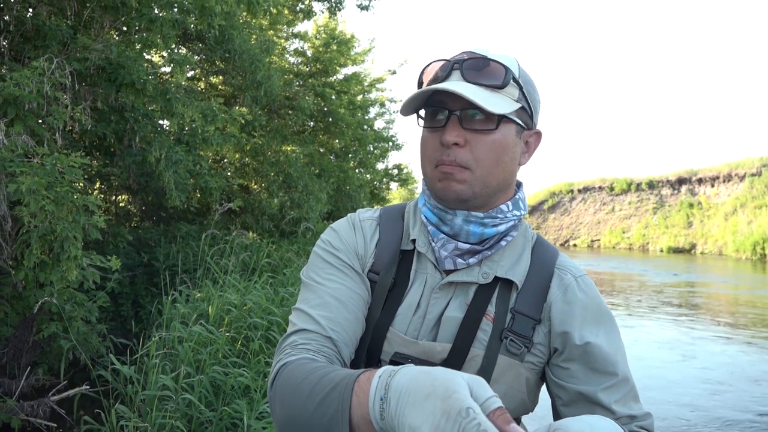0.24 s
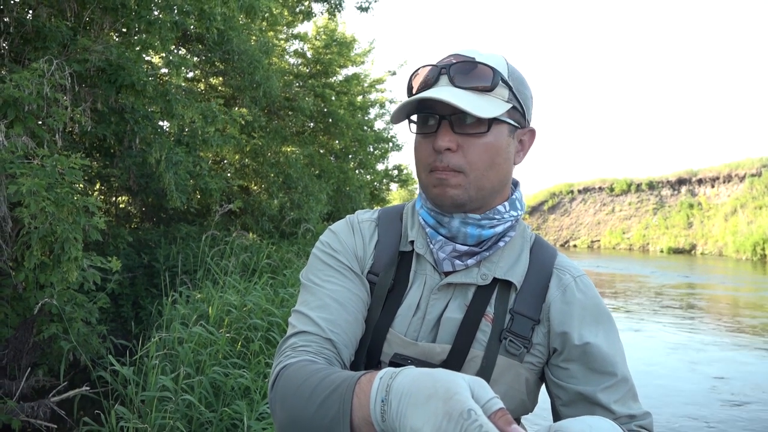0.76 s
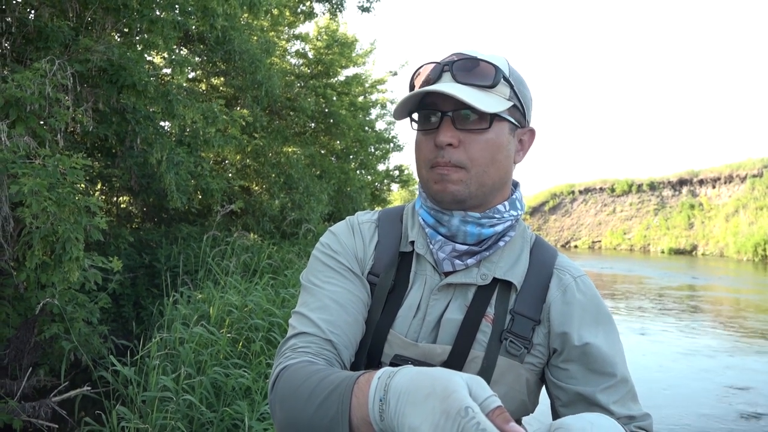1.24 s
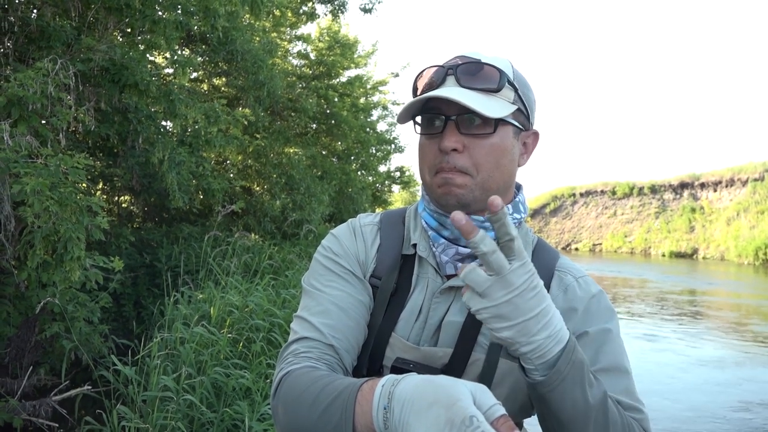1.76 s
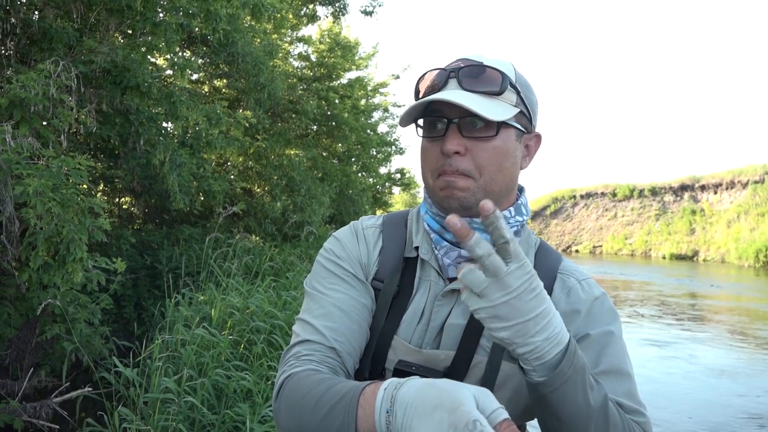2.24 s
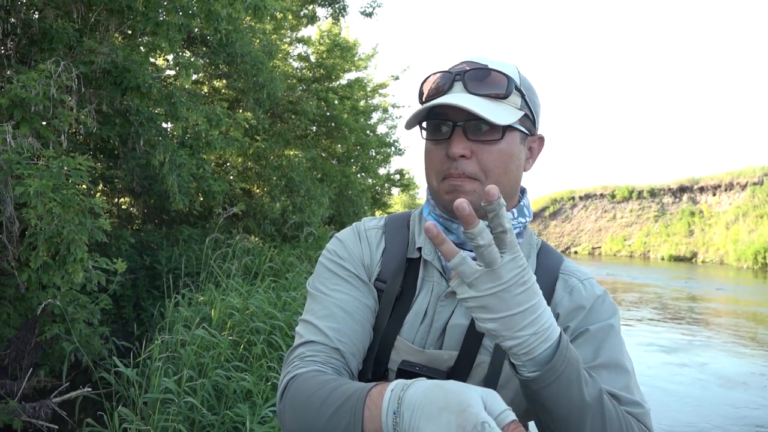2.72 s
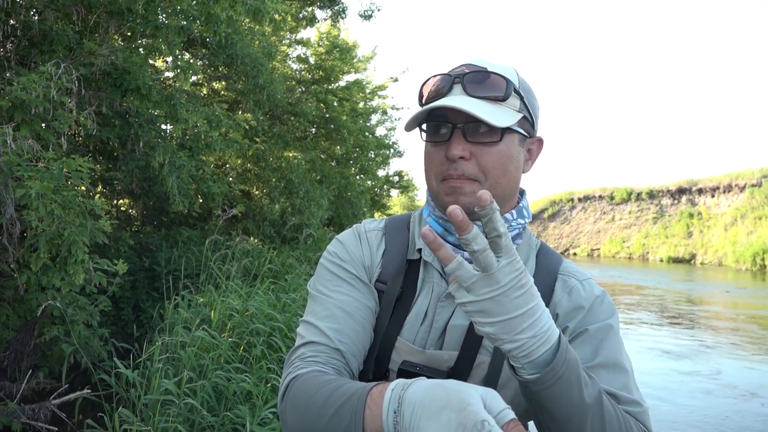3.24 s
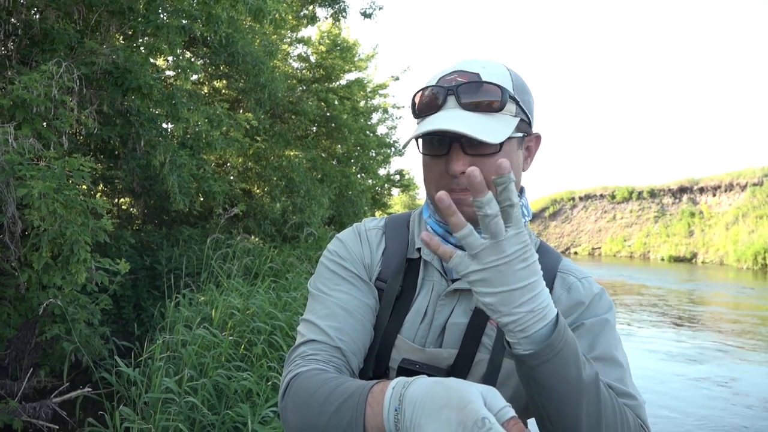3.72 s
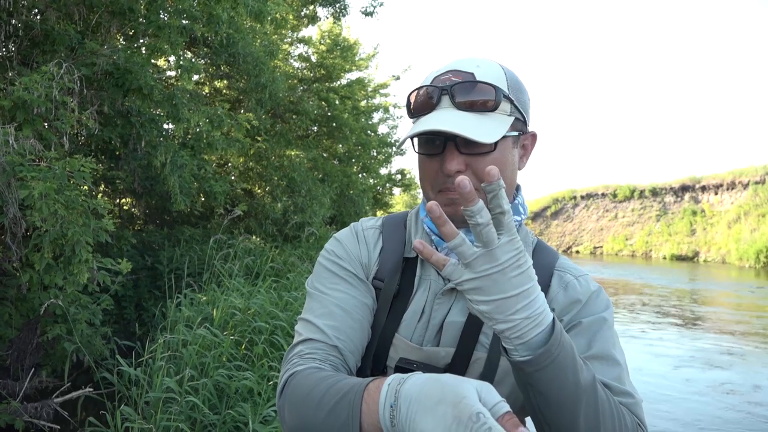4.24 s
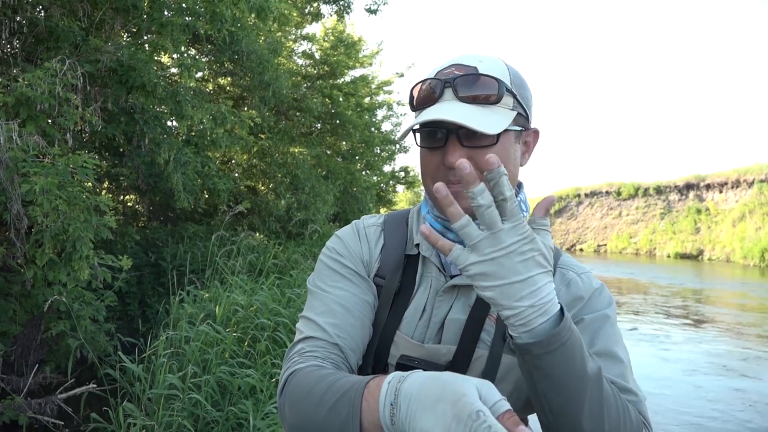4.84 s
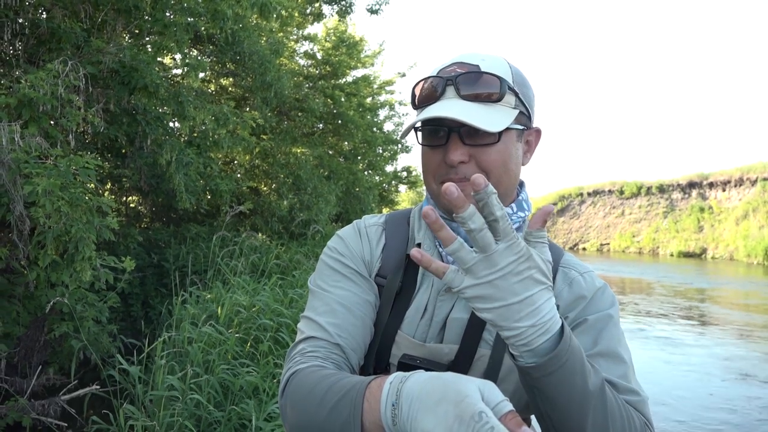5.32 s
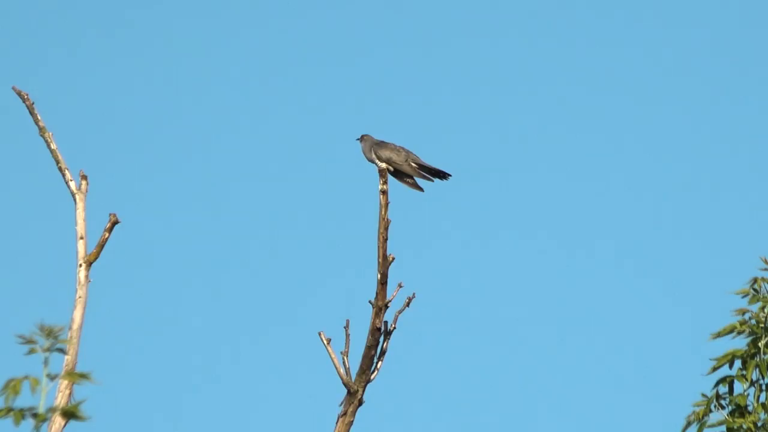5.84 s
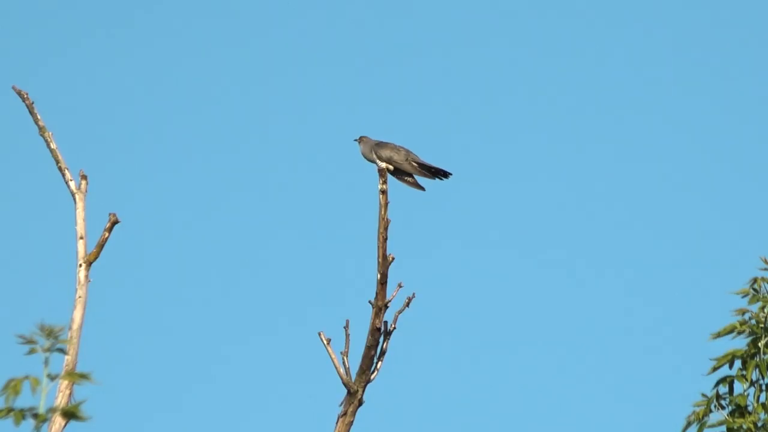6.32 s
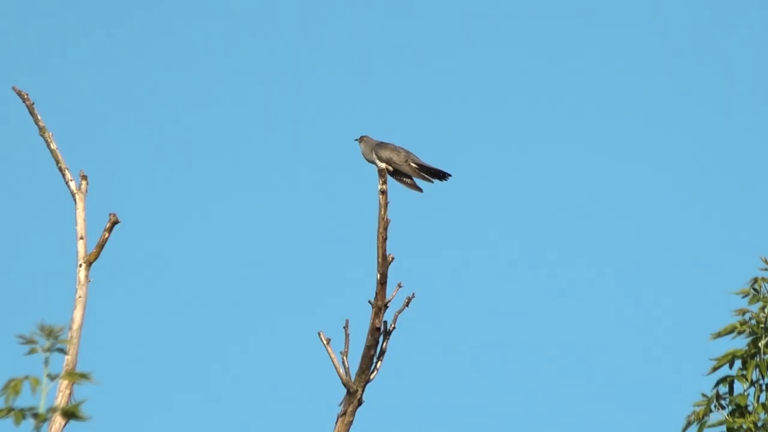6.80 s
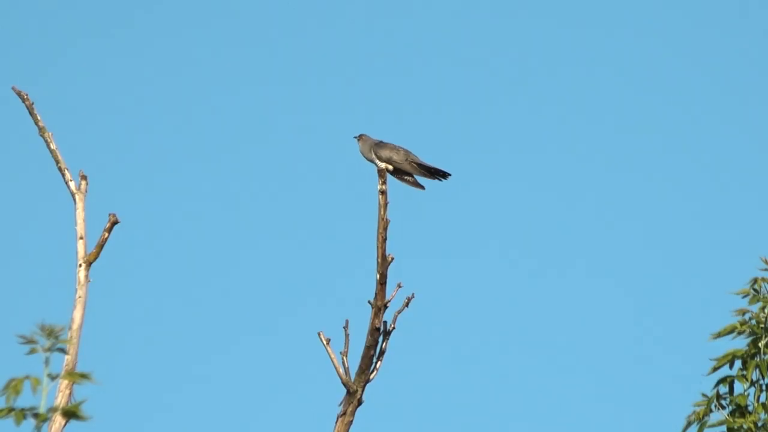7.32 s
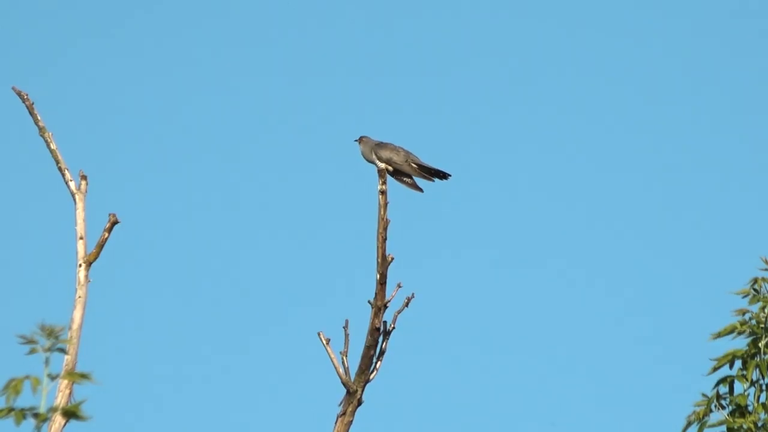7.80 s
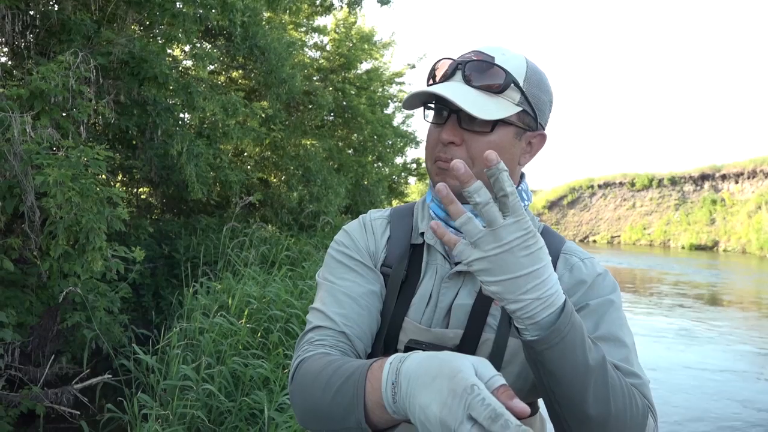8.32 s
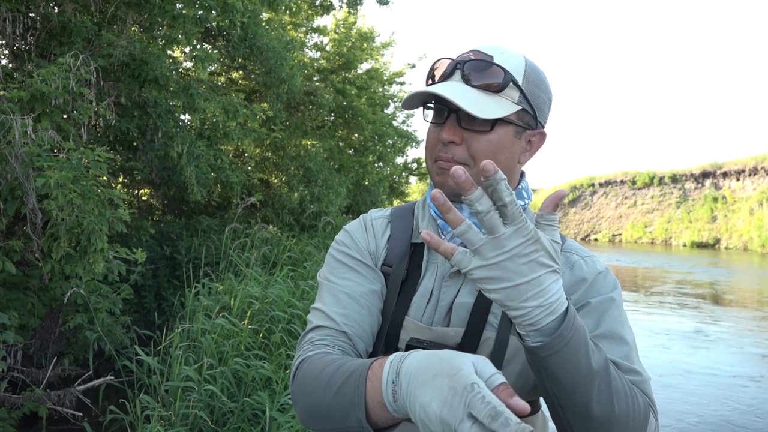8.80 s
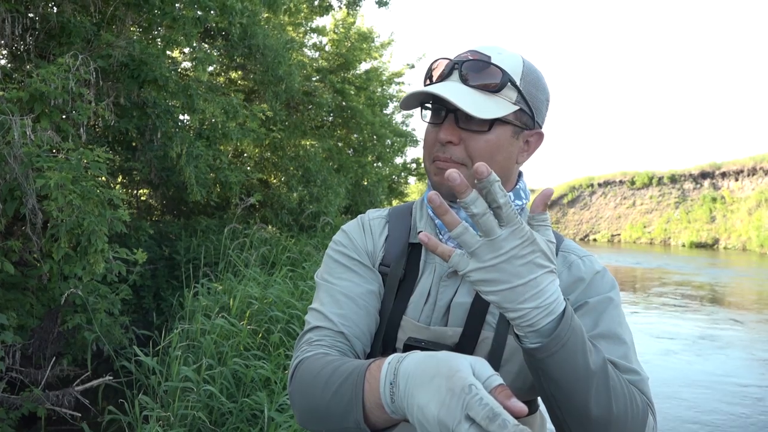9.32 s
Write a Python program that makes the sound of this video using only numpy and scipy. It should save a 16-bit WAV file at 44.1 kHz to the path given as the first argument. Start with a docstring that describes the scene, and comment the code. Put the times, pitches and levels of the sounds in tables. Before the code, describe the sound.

From the start a small river babbles close by: ringing bubbles, rising gurgles, plops, sharp droplet ticks and a soft wash, easing briefly around 0.5 s, with light breeze rumble that gusts from 3 to 4.5 s. A cuckoo calls at about 0.4, 1.9, 3.3 and 4.7 s, each an arched, nearly pure high note followed 0.3 s later by a louder, sagging lower one. A tiny bird whistle falls near 1.1 s. At 5.7 s water and breeze stop abruptly, leaving faint airy hiss. Cuckoo calls at 6.1 and 7.4 s are quieter, with stronger woodland echo. Thin falling chips, a soft trill around 6.0 to 6.6 s, and from 6.8 s a rapid, swelling string of hooked warbles ending in a hoarse slur near 8 s fill the space. At 8.2 s the bubbling river returns abruptly; the last full cuckoo call comes at 8.7 s, and water continues to the end.

```python
"""Cuckoo by a small river

A cuckoo repeats its two-note call, near-sine glides, from a dead tree by a river that gurgles and spatters.
The water is ringing bubbles, gliding gurgles, noisy splashes and a soft wash; a breeze rumbles on the microphone.
For a while one listens away from the water, farther from the bird: river and breeze are silent, and the calls
are quieter and echo more strongly off the wood's edge. Songbirds whistle short slurs, blurred by noise tails."""
import sys
import numpy as np
from scipy import signal
from scipy.fft import rfft, irfft
from scipy.io import wavfile
from scipy.ndimage import uniform_filter1d

SR = 44100
rng = np.random.default_rng(int(sys.argv[2]) if len(sys.argv) > 2 else 0)


def unload_wav(signal):
    """Save mono or channel-first audio to the path in sys.argv[1] as 16-bit WAV at rate SR, clipped to [-1, 1]."""
    wavfile.write(
        sys.argv[1],
        SR,
        np.round(np.clip(np.atleast_2d(signal).T, -1, 1) * 32767).astype(np.int16),
    )


N = 421596
TIME = np.arange(N) / SR


def from_db(db):
    """Decibels to amplitude ratio."""
    return 10 ** (np.asarray(db) / 20)


def rms_one(x):
    """Scale to rms 1."""
    return x / np.sqrt(np.mean(x ** 2) + 1e-20)


def in_time(rows):
    """A curve of (s, value) rows at every sample."""
    return np.interp(TIME, *np.transpose(rows))


def at_hz(points, hz):
    """A spectrum read on a log-frequency axis."""
    known_hz, level = np.transpose(points)
    return np.interp(np.log(hz), np.log(known_hz), level)


def add(track, s, sound):
    """Mix a sound in at time s."""
    start = int(np.clip(round(s * SR), 0, N))
    track[start:start + len(sound)] += sound[:N - start]


def phase_of(hz):
    """Phase in radians of a gliding pitch."""
    return 2 * np.pi * np.cumsum(hz) / SR


def swell(t, length, attack, release):
    """A rounded attack, a hold and a rounded release; silent outside."""
    rise = np.sin(np.pi / 2 * np.clip(t / attack, 0, 1))
    return rise * np.sin(np.pi / 2 * np.clip((length - t) / release, 0, 1))


def noise(spectrum):
    """Noise of the given colour; rms 1."""
    hz = np.maximum(np.fft.rfftfreq(N, 1 / SR), 1)
    return rms_one(irfft(rfft(rng.standard_normal(N)) * from_db(at_hz(spectrum, hz)), N))


def foliage(x, t60, build_s):
    """Countless small reflections off leaves and trunks build up and die away."""
    t = np.arange(SR) / SR
    tail = rng.standard_normal(SR) * from_db(-60 * t / t60) * (1 - np.exp(-t / build_s))
    return signal.fftconvolve(x, tail / np.linalg.norm(tail))[:N]


# Colour of far river and leaves. Each row: frequency in Hz, relative level in dB per Hz.
AIR_COLOUR = [(20, -12), (55, 3), (150, -1), (270, 0), (420, 5), (800, 2.5), (1500, -3.5), (3000, -4),
              (7000, -13), (16000, -17.5)]


def air():
    """Far river and leaves merge into steady coloured noise."""
    return from_db(-62.5) * noise(AIR_COLOUR)


# Colour of the breeze on the microphone. Each row: frequency in Hz, relative level in dB per Hz.
BREEZE_COLOUR = [(20, -23), (45, -1), (70, 2), (120, -6), (250, -12), (600, -54)]
# Gusts on the microphone. Each row: start in seconds, length in seconds, level in dB.
BREEZE_GUSTS = [(3, 1.55, -57), (4.452, 3.8, -66), (8.25, 1.5, -69)]
STEADY_BREEZE_DB, GUST_EDGE_S = -71, 0.3


def breeze():
    """A light steady rumble on the microphone, with gusts on top."""
    gusts = sum(from_db(db) * swell(TIME - s, length, GUST_EDGE_S, GUST_EDGE_S)
                for s, length, db in BREEZE_GUSTS)
    return (from_db(STEADY_BREEZE_DB) + gusts) * noise(BREEZE_COLOUR)


def lapping(count, spread_db):
    """Wavelets lap one after another, unevenly spaced and unequal in strength: rows of (s, dB)."""
    lag, strength = rng.random((count, 2)).T
    lap_s = (np.arange(count) + 2 * lag - 1) / count * TIME[-1]
    return np.column_stack([lap_s, spread_db * (2 * strength - 1)])


def bubble(hz, t60, rise):
    """Trapped air swells within about half a cycle, rings and dies; its pitch shifts as it nears the surface."""
    age = np.linspace(0, 1, max(int(t60 * SR), 8))
    phase = phase_of(hz * (1 + rise * age))
    onset = 1 - np.exp(-(phase / np.pi) ** 2)
    return np.sin(phase) * onset * np.exp(-np.log(1000) * age)


# Small bubbles by size. Each row: pitch in Hz, relative level in dB.
BUBBLE_LEVELS = [(350, -14), (600, 7.5), (1100, 10), (2000, 11), (3200, 10), (5000, 2.5), (7500, 2),
                 (11000, 0.5)]


def babble(laps, count, spread_db, cycles, flurry_s=.05):
    """Each lap of the water sheds a flurry of small bubbles of all sizes; the low ones ring longest."""
    out = np.zeros(N)
    lap_s, lap_db = laps[np.arange(count) % len(laps)].T
    lag, pitch, size, damping, depth = rng.random((count, 5)).T
    starts_s = lap_s + flurry_s * lag ** 2
    pitches = 350 * 32 ** pitch
    size_db = spread_db * (np.minimum(-np.log(1 - size), 3.1) - 2)
    gains = from_db(lap_db + at_hz(BUBBLE_LEVELS, pitches) + size_db)
    rings_s = cycles * (.5 + damping) / pitches
    rises = 0.603 * depth ** 2 - .25
    for s, hz, gain, t60, rise in zip(starts_s, pitches, gains, rings_s, rises):
        add(out, s, gain * bubble(hz, t60, rise))
    return out


GURGLE_CYCLES = 45   # length in cycles of the first pitch


def gurgle(length, first_hz, last_hz, flutter_db=4.5, flutter_rate=170):
    """A pocket of air rings: its pitch glides ever faster and flutters as the water laps it."""
    along = np.linspace(0, 1, max(int(length * SR), 8))
    laps = np.interp(along * length * flutter_rate, np.arange(64), rng.standard_normal(64))
    hz = first_hz * (last_hz / first_hz) ** (along ** 1.376) * (1 + 0.0084 * laps)
    return np.sqrt(2) * np.sin(phase_of(hz)) * np.sin(np.pi * along ** 0.81) * from_db(flutter_db * laps)


def eddies(count, level_db, low_hz, high_hz, climb_share):
    """Soft upward gurgles at random moments, the low ones slowest."""
    out = np.zeros(N)
    for when, pitch, size, climb in rng.random((count, 4)):
        hz = low_hz * (high_hz / low_hz) ** pitch
        ring = gurgle(GURGLE_CYCLES / hz, hz, hz * (1 + climb_share * climb))
        add(out, when * TIME[-1], from_db(level_db - 10 * size) * ring)
    return out


def droplet(hz, t60, splash_db):
    """A drop strikes the surface: a broad tick and a tiny ringing bubble."""
    t = np.arange(SR // 50) / SR
    fade = np.exp(-np.log(1000) * t / t60)
    tick = from_db(splash_db) * rng.standard_normal(len(t)) * fade ** 2
    return np.sin(2 * np.pi * hz * t) * fade + tick


def spray(laps, count, level_db, spread_db, low_hz, high_hz, ring_s=0.0014, splash_db=-4, flurry_s=0.04):
    """With each lap the finest bubbles burst: a dense patter of ticks, each with a pitch of its own."""
    out = np.zeros(N)
    for k, (lag, pitch, size) in enumerate(rng.random((count, 3))):
        lap_s, lap_db = laps[k % len(laps)]
        db = level_db + lap_db + spread_db * (min(-np.log(1 - size), 3.6) - 1)
        hz = low_hz * (high_hz / low_hz) ** pitch
        add(out, lap_s + flurry_s * lag ** 2, from_db(db) * droplet(hz, ring_s, splash_db))
    return out


def splash(hz, t60):
    """The surface tears as a big bubble forms: a short rush of noise around and above its pitch."""
    t = np.arange(SR // 8) / SR
    band = signal.butter(1, [.8 * hz, 2 * hz], "band", fs=SR, output="sos")
    return rms_one(signal.sosfilt(band, rng.standard_normal(len(t)))) * from_db(-60 * t / t60)


# The loudest bubbles. Each row: start in seconds, pitch in Hz, level in dB.
BIG_BUBBLES = [ (.128, 344, -46.5), (.235, 838, -30.5), (.284, 423, -41), (.283, 1740, -31),
               (.632, 512, -40), (0.82, 1205, -35), (0.857, 1360, -32.5), (.916, 594, -25.5),
               (0.986, 1010, -29.5), (1.081, 1720, -28.5), (1.218, 1176, -26), (1.256, 1590, -25.5),
               (1.353, 993, -31.5), (1.381, 784, -31), (1.476, 2630, -29.5), (1.509, 760, -26),
               (1.522, 470, -27), (1.661, 856, -27), (1.695, 2270, -30), (1.757, 633, -29),
               (1.872, 820, -29), (2.054, 933, -30.5), (2.196, 1700, -32.5), (2.346, 905, -28),
               (2.604, 1310, -32), (2.622, 1980, -28), (2.672, 2900, -30.5), (2.755, 826, -24),
               (2.859, 1296, -25.5), (3.077, 2120, -29), (3.388, 2090, -26.5), (3.404, 800, -29),
               (3.437, 1390, -28.5), (3.453, 615, -29), (3.765, 1770, -30), (3.892, 623, -31.5),
               (3.934, 884, -30.5), (4.086, 435, -36.5), (4.132, 389.4, -33), (4.245, 1130, -30.5),
               (4.419, 844, -32), (4.537, 425, -33), (4.682, 680, -31.5), (4.853, 1690, -27.5),
               (4.89, 1030, -29), (4.907, 2700, -28.5), (5.206, 707, -25), (5.302, 1920, -31.5),
               (5.438, 2740, -30), (5.654, 800, -28.5), (8.197, 1240, -23.5), (8.257, 2040, -26),
               (8.297, 1016, -24.5), (8.333, 2260, -28), (8.372, 1213, -29.5), (8.373, 458, -33),
               (8.449, 718, -32.5), (8.45, 1450, -28), (8.532, 689, -31), (8.598, 1990, -27.5),
               (8.684, 2080, -33.5), (9.163, 1850, -32), (9.191, 580, -34), (9.286, 1570, -28.5),
               (9.519, 734, -26), (9.538, 2950, -28.5)]
PLOP_T60_AT_1KHZ_S, PLOP_RING_POWER = .045, 1.35   # ring time goes with this power of bubble size


def plops(count, splash_db, splash_s, shed_db, shed_s):
    """Just after a small splash each big bubble rings, and sheds a few weaker ones of similar size."""
    out = np.zeros(N)
    for s, hz, db in BIG_BUBBLES:
        t60 = PLOP_T60_AT_1KHZ_S * (1000 / hz) ** PLOP_RING_POWER
        add(out, s, from_db(db) * bubble(hz, t60, rise=0.11))
        add(out, s - .004, from_db(db + splash_db) * splash(hz, splash_s))
        for lag, pitch, rise in rng.random((count, 3)):
            ratio = .7 * 3 ** pitch
            shed = bubble(hz * ratio, t60 / ratio, rise / 2)
            add(out, s + shed_s * lag, from_db(db + shed_db - 10 * lag) * shed)
    return out


# How hard the river churns. Each row: time in seconds, level in dB.
CHURN = [(0, -48.5), (.4, -54.5), (.55, -58), (.7, -50.5), (.98, -50.5), (1.7, -48.5), (2.45, -50.5),
         (3.3, -49), (4.4, -50), (4.51, -53), (4.65, -49), (5.6, -50.5), (8.22, -50.5), (9.55, -50)]
# Gliding pockets of air. Each row: start in seconds, first pitch in Hz, last pitch in Hz, level in dB.
AIR_POCKETS = [(.005, 318, 403, -53.5), (.273, 595, 1380, -42), (.905, 548, 1004, -45),
               (1.1, 452, 540, -48.5), (1.222, 1135, 2010, -44), (1.371, 423, 339, -49.5),
               (1.474, 440.5, 1200, -43), (1.515, 605, 1284, -40), (1.92, 403, 414, -53),
               (2.365, 567, 737, -47.5), (2.755, 825, 1120, -43.5), (3.285, 337, 484, -45),
               (3.835, 1300, 1630, -43.5), (3.995, 917, 1490, -44), (4.26, 362, 492, -51.5),
               (4.34, 571, 1200, -51.5), (4.575, 561, 910, -51), (5.165, 521.4, 902, -36),
               (5.64, 985, 1750, -41.5), (8.615, 804, 946, -41.5), (9.29, 1640, 2410, -43.5),
               (9.515, 677, 1480, -51)]
# The sharpest droplet hits. Each row: start in seconds, level in dB, pitch in Hz.
DROPLET_HITS = [(.629, -30.5, 4300), (1.105, -32.5, 12000), (1.1226, -25, 7300), (1.474, -35.5, 11580),
                (1.6086, -36.5, 7500), (2.237, -30.5, 9200), (2.7334, -20, 8230), (2.7555, -24.5, 2010),
                (2.831, -33, 6800), (3.076, -34, 7460), (3.379, -31.5, 3940), (3.663, -35.5, 3400),
                (3.766, -36.5, 8800), (4.18, -33.5, 7800), (4.747, -29.5, 3580), (5.174, -35.5, 7460),
                (8.229, -34, 6330), (9.236, -30, 4330)]
# Colour of the soft wash. Each row: frequency in Hz, relative level in dB per Hz.
WASH_COLOUR = [(150, -14), (300, 1), (500, 0), (830, 11.5), (1800, 4.5), (3200, -3.5), (5500, -10.5),
               (15500, -24)]


def river():
    """The churn drives small bubbles, eddies, spray and a soft wash; big plops, gurgles and droplets stand out."""
    churn = from_db(in_time(CHURN))
    laps = lapping(count=320, spread_db=4.0)
    small = from_db(-2.5) * babble(laps, count=5200, spread_db=4.0, cycles=63.4)
    small += eddies(count=130, level_db=-0.5, low_hz=514.7, high_hz=2575, climb_share=0.645)
    small += eddies(count=10, level_db=-7.5, low_hz=340.3, high_hz=476, climb_share=0.24)
    small += spray(laps, count=4000, level_db=-4.5, spread_db=5.5, low_hz=5870, high_hz=14500)
    water = churn * small
    water += plops(count=4, splash_db=-17.0, splash_s=0.051, shed_db=-10.5, shed_s=.04)
    for s, first_hz, last_hz, db in AIR_POCKETS:
        add(water, s, from_db(db) * gurgle(GURGLE_CYCLES / first_hz, first_hz, last_hz))
    for s, db, hz in DROPLET_HITS:
        add(water, s, from_db(db) * droplet(hz, t60=0.0071, splash_db=-3.5))
    # no bubble is large enough to ring in the bass, and the very top is soft
    water = signal.sosfilt(signal.butter(4, 310, "high", fs=SR, output="sos"), water)
    water = signal.sosfilt(signal.butter(2, 14500, fs=SR, output="sos"), water)
    wash = churn * from_db(-4.0) * noise(WASH_COLOUR)
    return water + from_db(-16.5) * foliage(water, t60=0.18, build_s=0.0013) + wash


def whistle(length, first_hz, last_hz, bend=1.2, flutter_db=8.0, waver_hz=0):
    """A slur that starts fast and eases towards its last pitch; strength flutters and pitch may waver."""
    along = np.linspace(0, 1, int(length * SR))
    knots = np.linspace(0, 1, 20)
    flutter, waver = (np.interp(along, knots, row) for row in rng.uniform(-1.1, 1, (2, 20)))
    hz = last_hz + (first_hz - last_hz) * (1 - along) ** bend + waver_hz * waver
    return np.sqrt(2) * np.sin(phase_of(hz)) * np.sin(np.pi * along) * from_db(flutter_db * flutter)


# Single notes. Each row: start in seconds, length in seconds, first pitch in Hz, last pitch in Hz,
# level in dB, share arriving straight (0-1).
BIRD_NOTES = [ (0.71, 0.04, 5250, 5330, -47, 0.97), (1.137, 0.1, 5330, 3030, -45.5, 0.96),
              (5.645, 0.03, 3250, 4430, -51, 0.8), (5.715, 0.067, 3510, 2645, -46.5, 0.71),
              (6.385, 0.019, 5670, 4530, -53, 0.5), (6.417, 0.02, 6270, 5970, -59, 0.9),
              (6.487, 0.032, 6000, 5450, -58, 0.7), (6.505, 0.023, 6200, 6570, -62, 0.7),
              (6.578, .02, 5570, 4620, -55.5, .6), (6.623, .06, 4410, 3800, -60.5, 0.7),
              (6.596, 0.041, 7000, 6200, -64, 0.6), (8.158, 0.036, 3120, 3560, -53, 1)]
# The soft trill before mixing. Each row: time in seconds, level in dB.
TRILL_LEVEL = [(6.04, -54.5), (6.2, -58), (6.29, -46.5), (6.34, -58), (6.47, -60.5), (6.62, -76)]
TRILL_RATE_HZ, TRILL_SWING_HZ = 36, 90


def songbirds(trill_hz, trill_climb_hz_per_s):
    """Slurs and a soft trill, blurred by the leaves; a faint lingering high tone, like a whistle's reverberation."""
    scattered, straight = np.zeros(N), np.zeros(N)
    for s, length, first_hz, last_hz, db, share in BIRD_NOTES:
        note = from_db(db) * whistle(length, first_hz, last_hz, waver_hz=0.3 * (first_hz - last_hz))
        add(scattered, s, np.sqrt(1 - min(share, 1) ** 2) * note)
        add(straight, s, share * note)
    lingering = whistle(length=0.67, first_hz=4740, last_hz=4715, flutter_db=1.5)
    add(straight, 6.55, from_db(-62.5) * lingering)
    trill_start_s, trill_end_s = TRILL_LEVEL[0][0], TRILL_LEVEL[-1][0]
    beat = 2 * np.pi * TRILL_RATE_HZ * TIME
    singing = (TIME > trill_start_s) & (TIME < trill_end_s)
    pitch = trill_hz + trill_climb_hz_per_s * (TIME - trill_start_s) + TRILL_SWING_HZ * np.cos(beat)
    pulses = ((1 + np.sin(beat)) / 2) ** 2
    trill = singing * from_db(in_time(TRILL_LEVEL)) * pulses * np.sin(phase_of(pitch))
    return straight + 0.88 * trill + foliage(scattered + 0.8 * trill, t60=1.0, build_s=0.0041)


CHIP_START_S, CHIP_STEP_S, CHIP_SLOWING_S = 5.724, .118, 0.00073
CHIP_DB, CHIP_GROWTH_DB = -63.5, 1   # first chip before mixing; growth per chip


def chips(count, leaves_db):
    """Thin falling chips, ever wider apart and louder, blurred by the leaves."""
    out = np.zeros(N)
    for k in range(count):
        s = CHIP_START_S + CHIP_STEP_S * k + CHIP_SLOWING_S * k ** 2
        chip = whistle(length=0.06, first_hz=6360, last_hz=5620, bend=3.5, flutter_db=0.0, waver_hz=90)
        add(out, s, from_db(CHIP_DB + CHIP_GROWTH_DB * k) * chip)
    return 0.6 * out + from_db(leaves_db) * foliage(out, t60=.12, build_s=.002)


def hook(length, low_hz, drop_share, turn_share):
    """A slur that dives to its lowest pitch and curls up a little at the end, swelling and fading."""
    along = np.linspace(0, 1, int(length * SR))
    hz = low_hz * (1 + drop_share * (1 - along / turn_share) ** 2)
    return np.sqrt(2) * np.sin(phase_of(hz)) * np.sin(np.pi * along ** 1.2)


# The warbler off nearby trunks. Each row: delay in seconds, level in dB.
TRUNK_ECHOES = [(.036, -24), (0.059, -15)]
WARBLE_START_S, WARBLE_STEP_S, WARBLE_SETTLE_NOTES = 6.783, .15, 3.7
WARBLE_END_HZ, WARBLE_SINK_HZ = 3095, 584
WARBLE_END_DB, WARBLE_SWELL_DB = -40.5, 13.5   # before mixing


def warbler(count, grace_s, grace_db, closing_db, leaves_db):
    """Even hooked slurs sink and swell, each with trunk echoes and a quick high stroke; a hoarse slur ends it."""
    slurs, graces, closing = np.zeros(N), np.zeros(N), np.zeros(N)
    for k in range(count):
        s = WARBLE_START_S + WARBLE_STEP_S * k
        unsettled = np.exp(-k / WARBLE_SETTLE_NOTES)
        hz = WARBLE_END_HZ + WARBLE_SINK_HZ * unsettled
        swell_db = -WARBLE_SWELL_DB * unsettled
        slur = hook(.046, hz * (1 + rng.normal(0, 0.0164)), drop_share=.35, turn_share=.85)
        add(slurs, s, from_db(WARBLE_END_DB + swell_db) * slur)
        grace = whistle(length=.024, first_hz=5400, last_hz=1.3 * hz, waver_hz=200)
        add(graces, s + grace_s, from_db(grace_db + swell_db / 2) * grace)
    hoarse = whistle(length=.125, first_hz=3300, last_hz=2080, waver_hz=480)
    add(closing, 7.975, from_db(closing_db) * hoarse)
    strokes = graces + closing
    out = slurs + 0.44 * strokes + foliage(strokes, t60=0.48, build_s=0.0036)
    for delay, db in TRUNK_ECHOES:
        add(out, delay, from_db(db) * slurs)
    return from_db(-3.0) * out + from_db(leaves_db) * foliage(slurs, t60=0.69, build_s=0.004)


# Note envelopes: length, attack and release in seconds.
CU_ENVELOPE_S, CKOO_ENVELOPE_S = (.1264, .0617, .0409), (.192, .0516, .05)
CU_START_HZ, CU_TOP_HZ, CU_END_HZ, CU_ARCH_POWER = 476.9, 686, 505.5, 2.21


def cu_pitch(t):
    """The high note arches up to a top and falls back."""
    along = t / CU_ENVELOPE_S[0]
    foot = CU_START_HZ + (CU_END_HZ - CU_START_HZ) * along
    return foot + (CU_TOP_HZ - foot) * np.abs(np.sin(np.pi * along)) ** CU_ARCH_POWER


CKOO_HZ, CKOO_SAG_HZ_PER_S, CKOO_SCOOP_HZ, CKOO_SCOOP_S = 507.5, 135, 47, .011


def ckoo_pitch(t):
    """The low note scoops up quickly, then sags."""
    return CKOO_HZ - CKOO_SAG_HZ_PER_S * t - CKOO_SCOOP_HZ * np.exp(-t / CKOO_SCOOP_S)


def hoot(pitch, ratio, envelope, overtone_db):
    """One cuckoo note: almost a pure sine, with a faint second and fainter third harmonic."""
    t = np.arange(int(envelope[0] * SR)) / SR
    phase = phase_of(ratio * pitch(t))
    overtones = from_db(overtone_db) * (np.sin(2 * phase) + from_db(-17) * np.sin(3 * phase))
    return swell(t, *envelope) * (np.sin(phase) + overtones)


# The cuckoo off the trees. Each row: delay in seconds, level in dB before the place's echo_db.
WOOD_ECHOES = [(.07, -31), (.143, -24)]


def cuckoo(calls, delivery, reflections, echo_db, scatter_db):
    """An arched high note, a gap, a sagging low note; the ground and the trees answer."""
    voice, (gap_s, ratio) = np.zeros(N), delivery
    for s, cu_db, ckoo_db in calls:
        cu = hoot(cu_pitch, ratio, CU_ENVELOPE_S, overtone_db=-21.5)
        ckoo = hoot(ckoo_pitch, ratio, CKOO_ENVELOPE_S, overtone_db=-35)
        add(voice, s, from_db(cu_db) * cu)
        add(voice, s + gap_s, from_db(ckoo_db) * ckoo)
    direct = voice.copy()
    for delay, gain in reflections:
        add(direct, delay, gain * voice)
    out = direct + from_db(scatter_db) * foliage(direct, t60=0.64, build_s=0.1)
    for delay, db in WOOD_ECHOES:
        add(out, delay, from_db(db + echo_db) * direct)
    return out


# The cuckoo's calls. Each row: start in seconds, level of "cu" in dB, level of "ckoo" in dB.
CALLS = [(0.4235, -29.5, -21), (1.8588, -29.5, -22), (3.2615, -30, -21.5), (4.7035, -29, -21.5),
         (6.1311, -31, -26.5), (7.4382, -30.5, -27), (8.6653, -29.5, -21.5)]
# Ground and nearby surfaces ripple the gliding notes. Each row: delay in seconds, signed gain.
BANK_REFLECTIONS, AWAY_REFLECTIONS = [(.00804, -.3), (.04002, .135)], [(.00667, .27), (.01507, .25)]
# Delivery as heard at each place: seconds from "cu" to "ckoo", pitch ratio.
BANK_DELIVERY, AWAY_DELIVERY = (.2988, 1), (.3068, 1.0185)
AWAY_FROM_S, AWAY_TO_S = 5.708, 8.18   # the stay away from the water


def scene():
    """Water and breeze are heard only from the bank; birds and air are everywhere."""
    is_away = (TIME > AWAY_FROM_S) & (TIME < AWAY_TO_S)
    away = uniform_filter1d(is_away.astype(float), size=600)
    far_calls = [call for call in CALLS if AWAY_FROM_S < call[0] < AWAY_TO_S]
    bank_calls = [call for call in CALLS if not AWAY_FROM_S < call[0] < AWAY_TO_S]
    calls = cuckoo(bank_calls, BANK_DELIVERY, BANK_REFLECTIONS, echo_db=-10, scatter_db=-29)
    calls += cuckoo(far_calls, AWAY_DELIVERY, AWAY_REFLECTIONS, echo_db=0, scatter_db=-15)
    birds = songbirds(trill_hz=2625, trill_climb_hz_per_s=230)
    birds += chips(count=7, leaves_db=-9.0)
    birds += warbler(count=8, grace_s=.091, grace_db=-48.5, closing_db=-48, leaves_db=1.0)
    return (calls + birds + air() + (1 - away) * (river() + breeze()))[None]


CUTOFF_HZ = 16000


def record(dry):
    """The top is cut steeply."""
    return signal.sosfilt(signal.ellip(10, .1, 80, CUTOFF_HZ, fs=SR, output="sos"), dry)


dry = scene()
out = record(dry)
unload_wav(out)
```